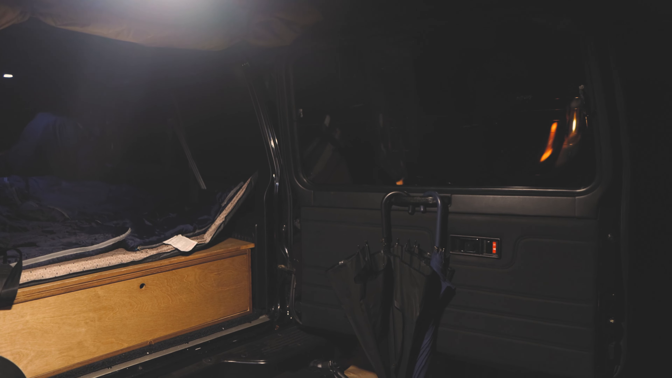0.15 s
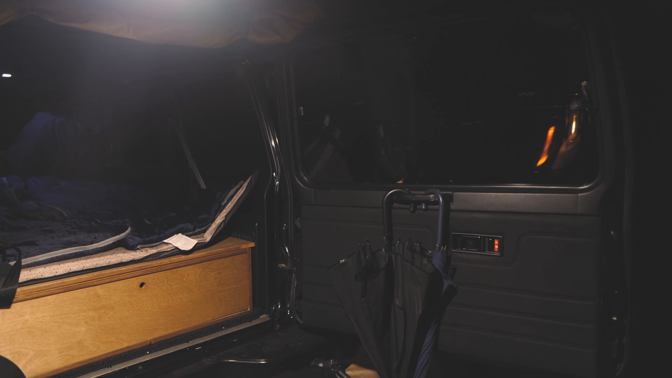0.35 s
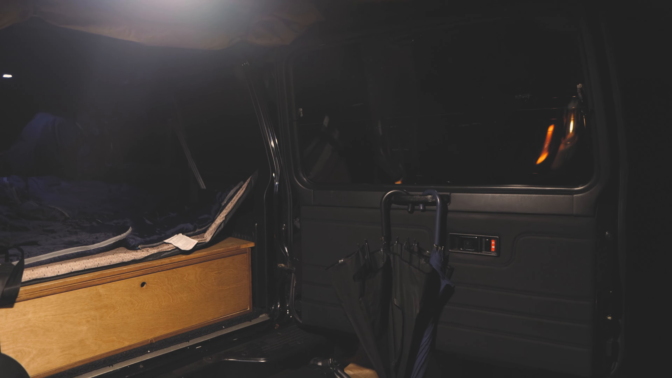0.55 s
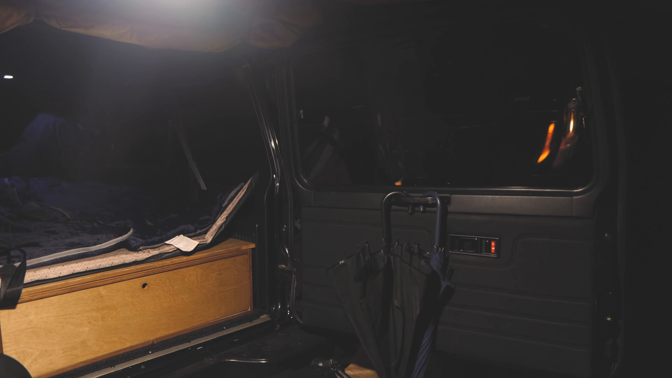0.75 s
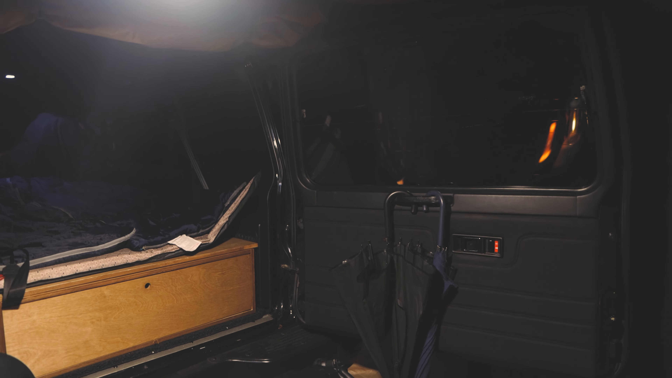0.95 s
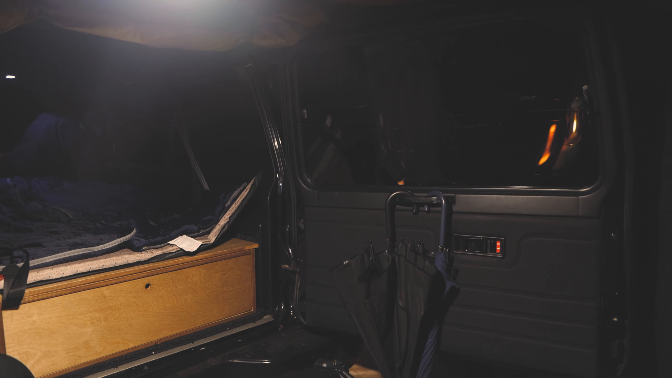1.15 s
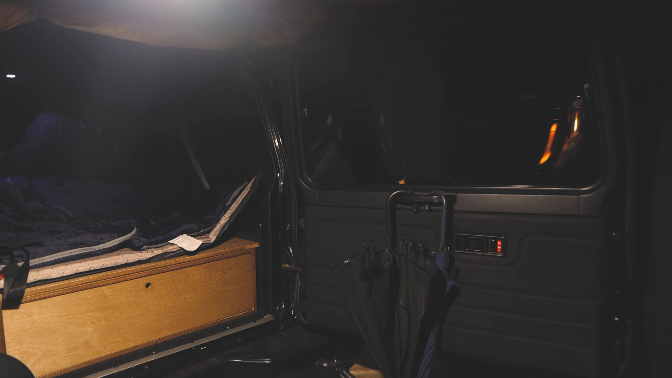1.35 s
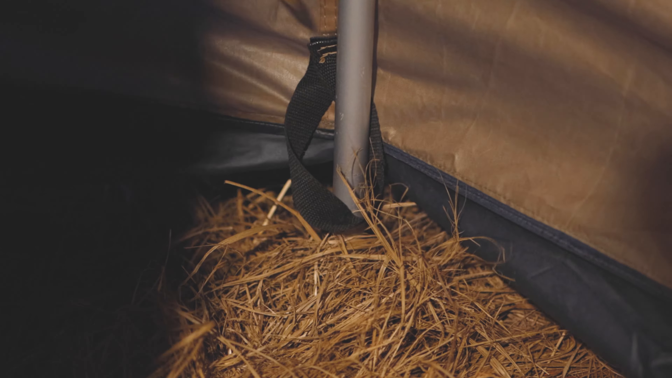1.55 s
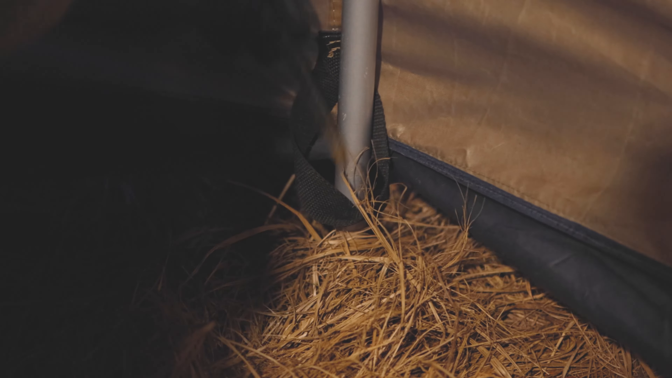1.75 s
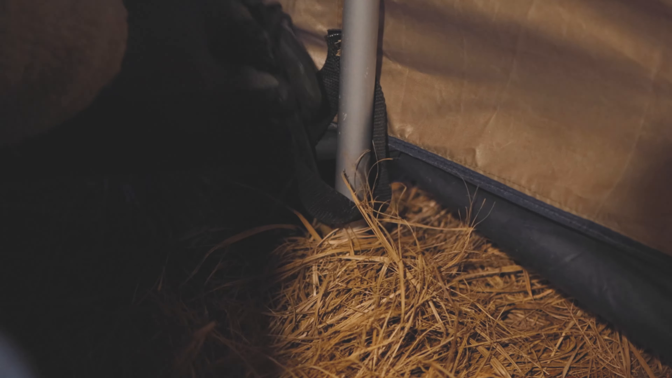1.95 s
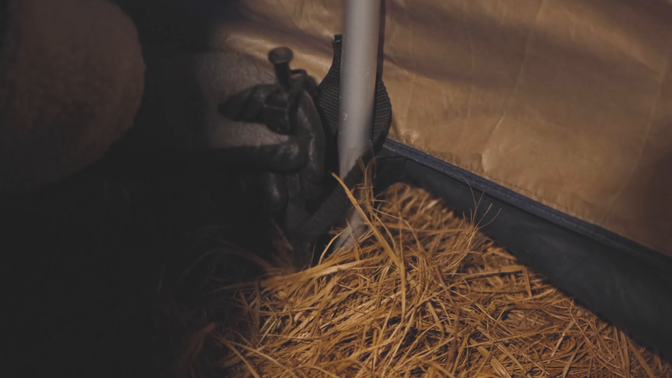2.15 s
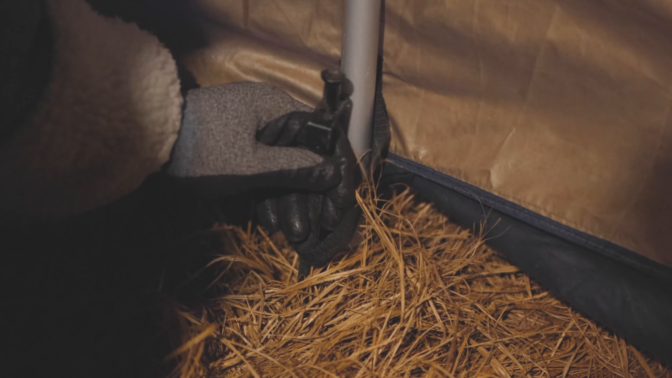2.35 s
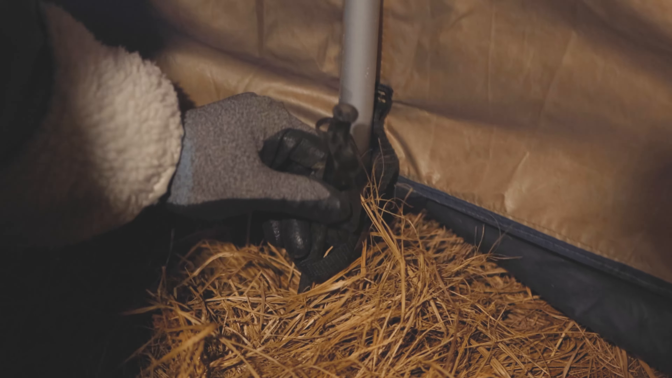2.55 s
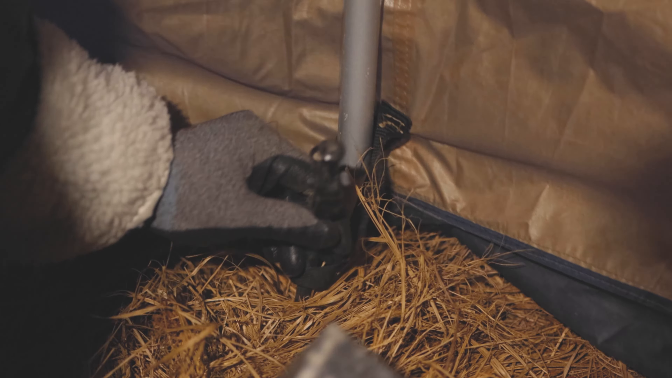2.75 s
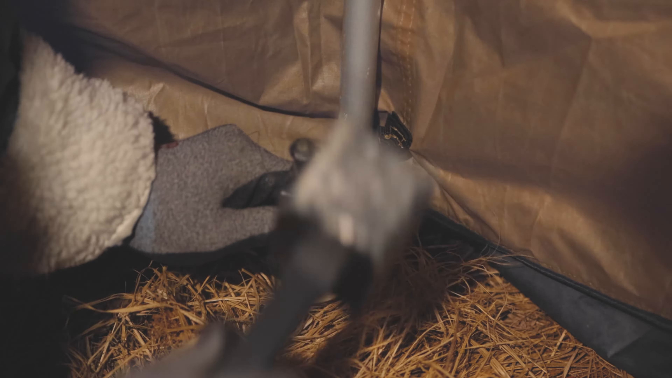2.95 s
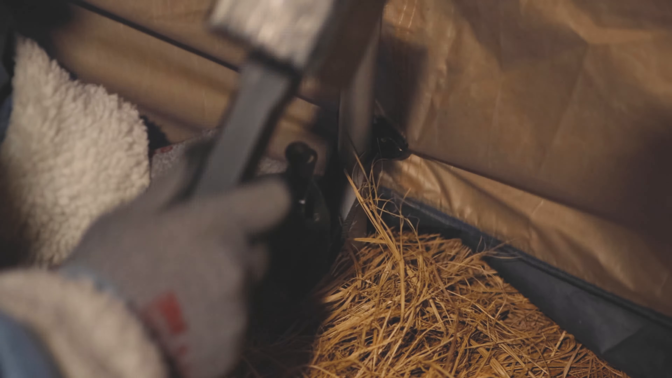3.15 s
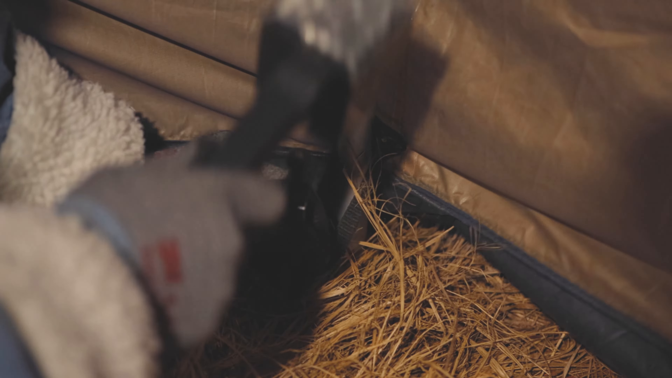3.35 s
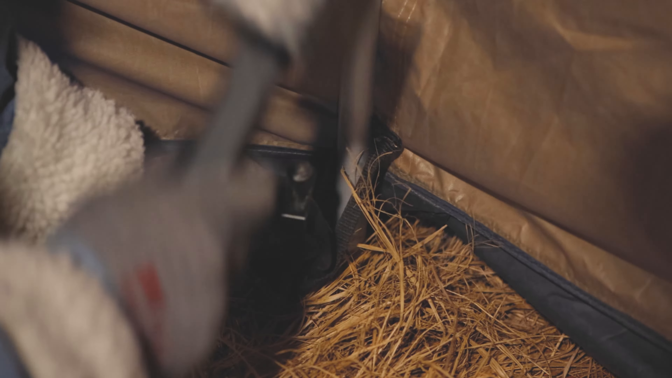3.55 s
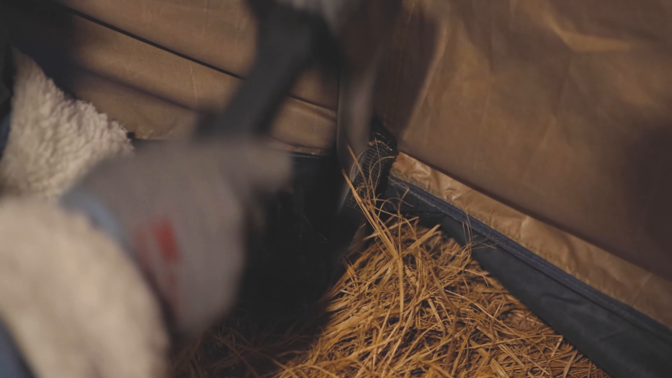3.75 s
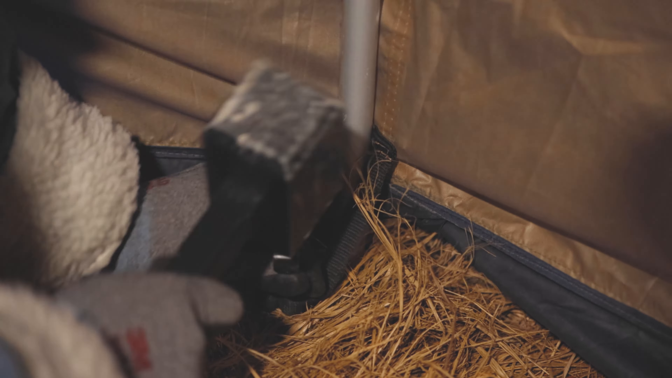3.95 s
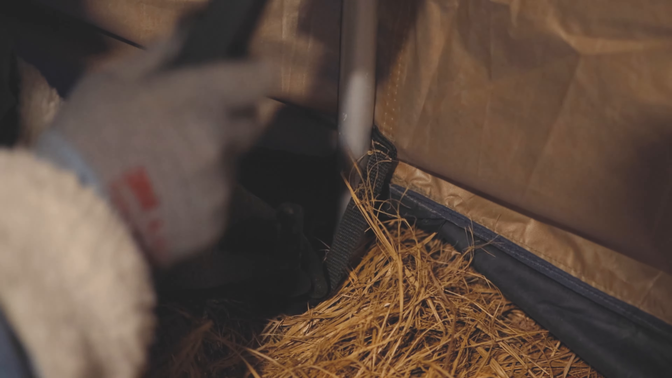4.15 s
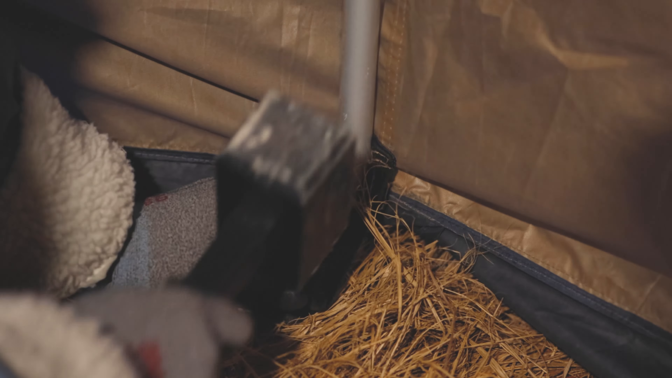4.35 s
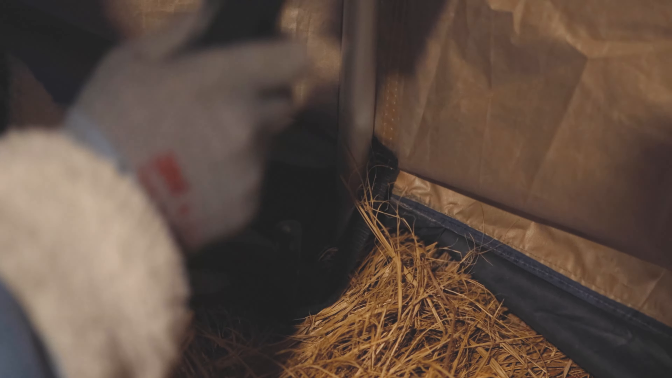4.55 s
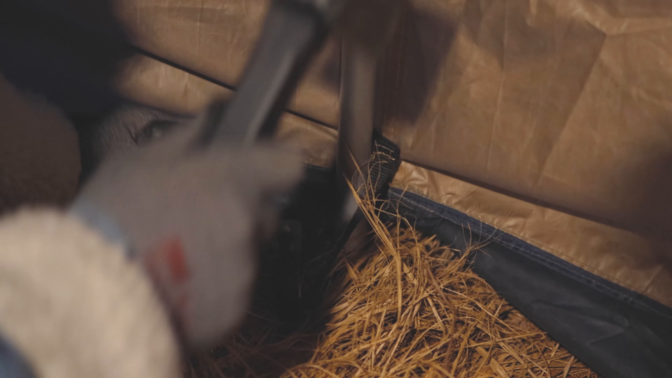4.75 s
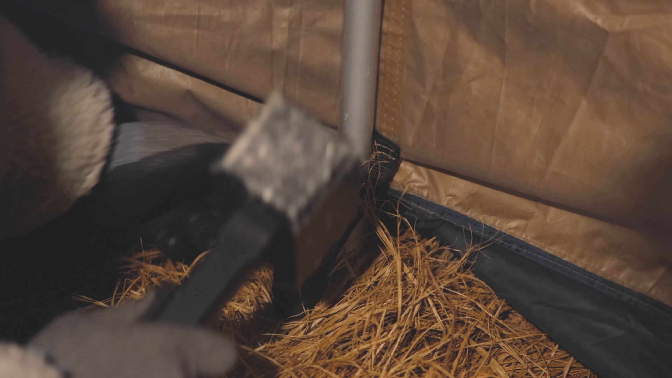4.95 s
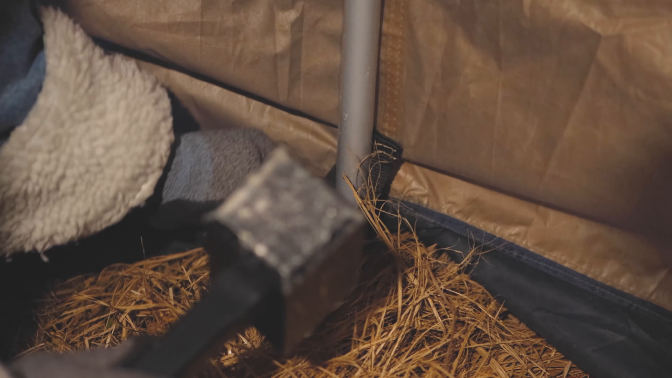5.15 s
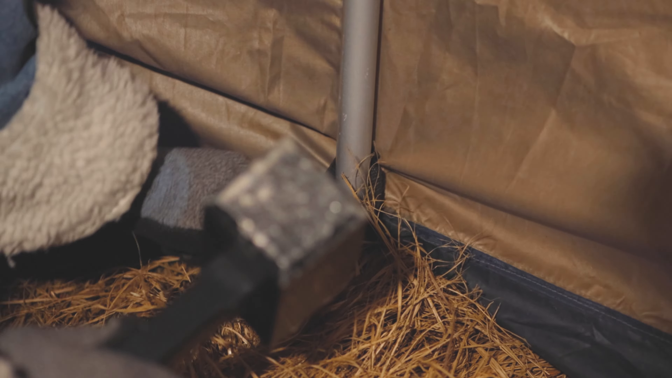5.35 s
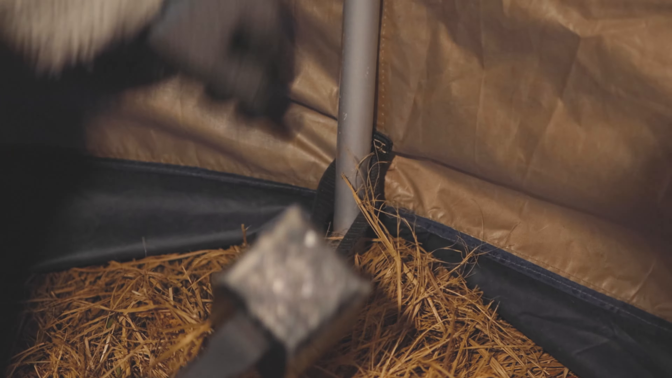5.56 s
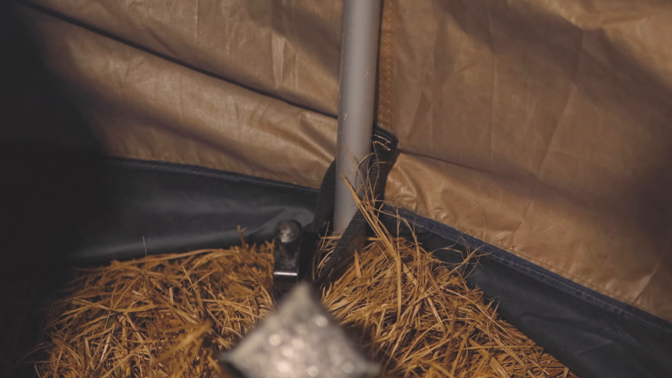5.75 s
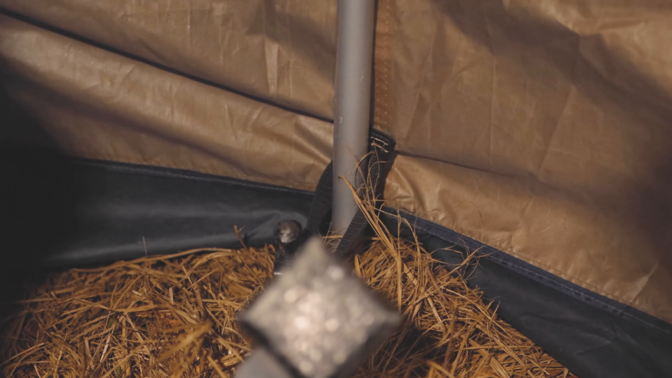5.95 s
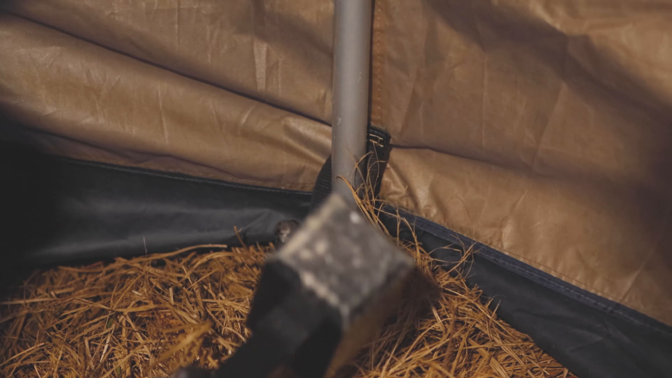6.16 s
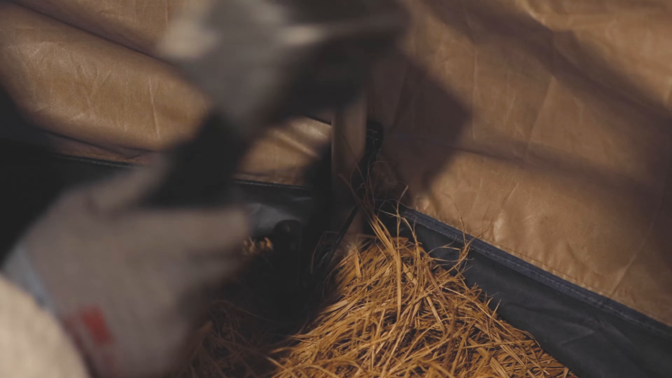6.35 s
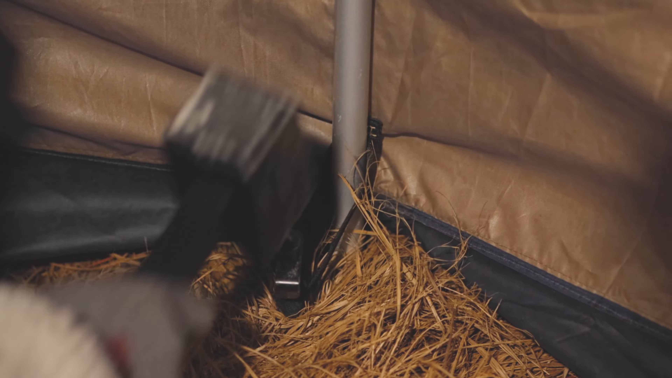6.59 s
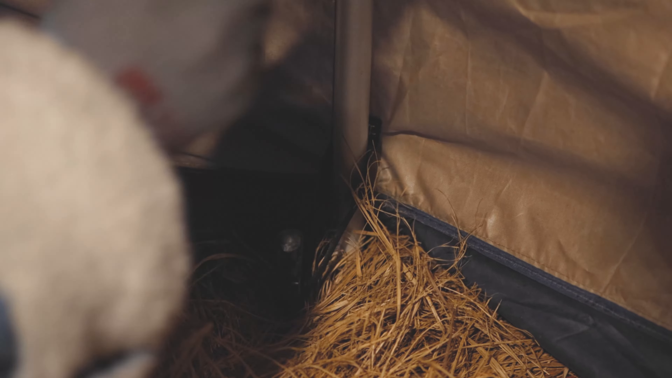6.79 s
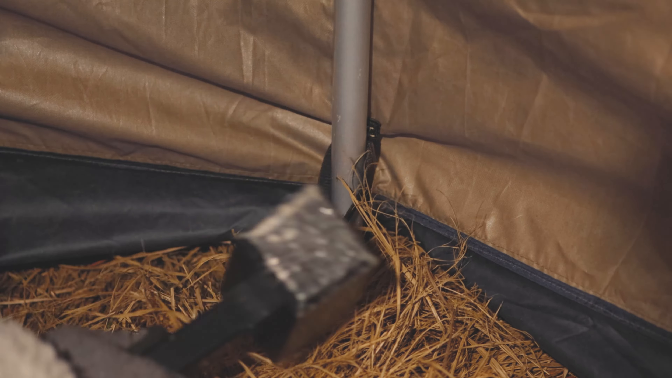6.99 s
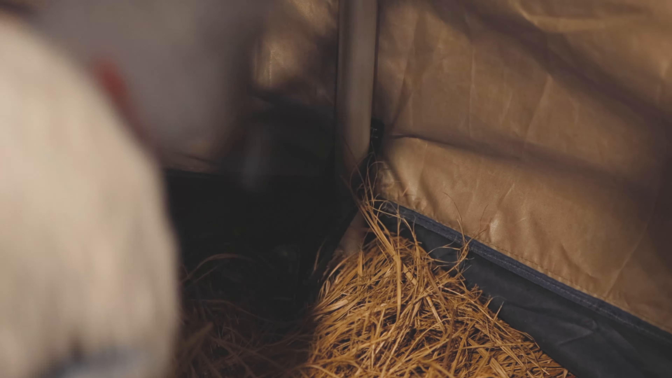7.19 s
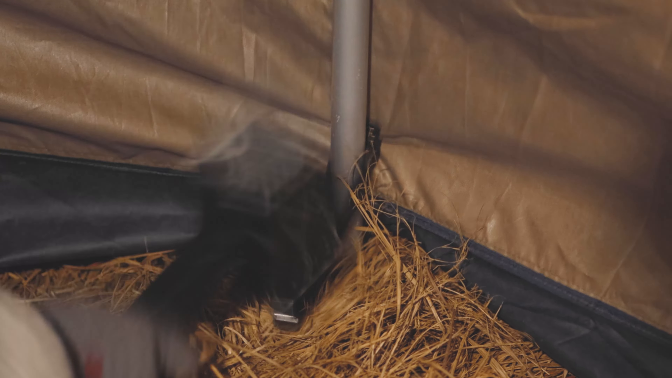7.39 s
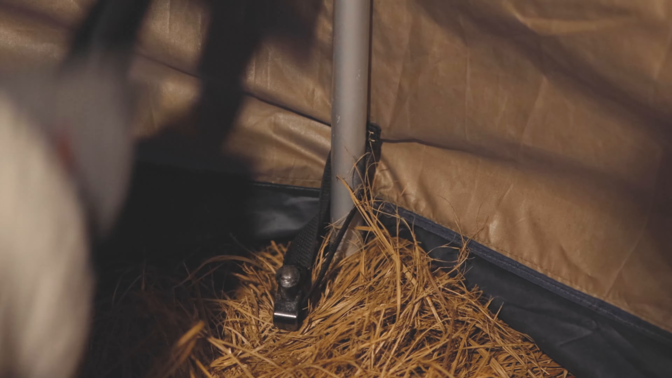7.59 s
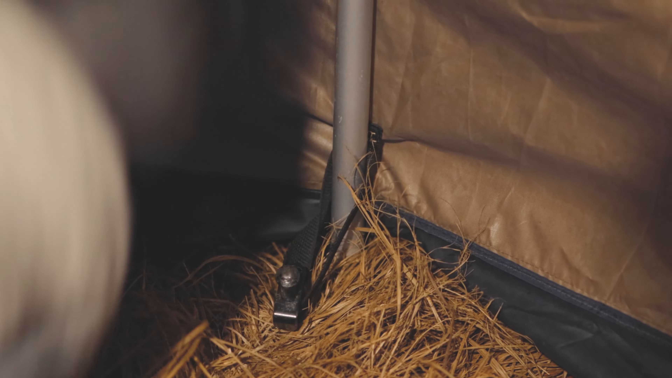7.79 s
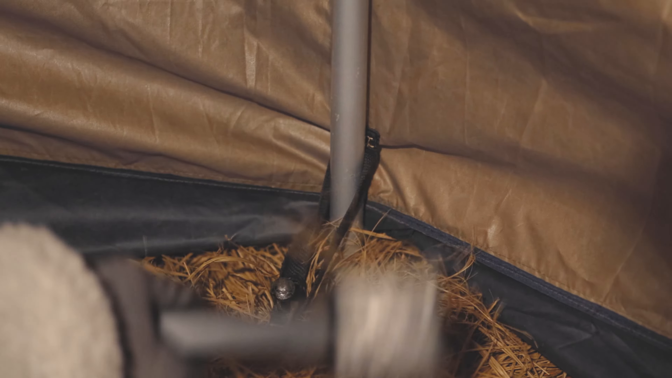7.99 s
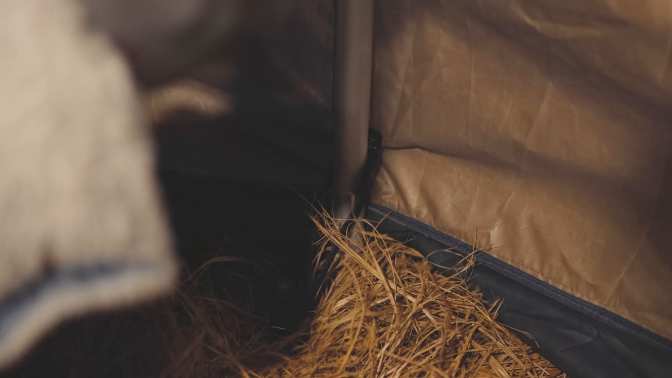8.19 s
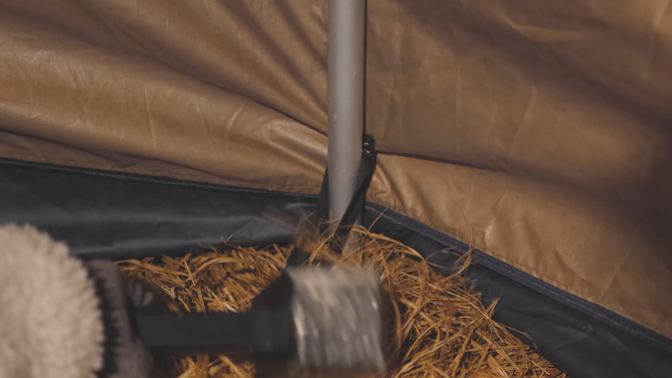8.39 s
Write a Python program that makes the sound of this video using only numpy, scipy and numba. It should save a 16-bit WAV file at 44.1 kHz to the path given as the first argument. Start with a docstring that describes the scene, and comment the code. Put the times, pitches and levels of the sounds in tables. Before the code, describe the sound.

After a quiet hush, clothing and straw rustle and a steel peg clinks, then eight sharp hammer blows drive it into the ground.

```python
"""Inside a quiet parked van, then at the corner of a tent at night, where a steel peg is set in straw.
Sleeves, canvas and straw rustle by friction over a low rumble, and a strap is dragged taut.
Held in a gloved hand, the peg clinks against its loose metal ring. Eight close hammer blows
excite its modes and thud into the soil; each overloads a gain control, which ducks briefly."""
import sys
import numpy as np
from scipy import signal
from scipy.fft import rfft, irfft
from scipy.io import wavfile
from scipy.ndimage import uniform_filter1d
from numba import njit

SR = 44100
rng = np.random.default_rng(int(sys.argv[2]) if len(sys.argv) > 2 else 0)


def transcribe(signal):
    """Save signal, clipped to [-1, 1], as a 16-bit WAV file at the path in sys.argv[1]."""
    frames = np.atleast_2d(signal).T
    limited = np.clip(frames, -1, 1)
    pcm = np.round(limited * 32767).astype(np.int16)
    wavfile.write(sys.argv[1], SR, pcm)


N = 371718
TIME = np.arange(N) / SR
AGE = np.arange(SR // 2) / SR  # time since a contact

# hammer blows: t/s, level/dB, peg f/Hz, then relative level/dB of bending, lengthwise ring, thud, rebound
BLOWS = [(3.3403, 9.5, 3010, -8, -6.5, -26, -39), (3.7090, 11, 2906, -5, -11, -25, -26.5),
         (4.0590, 11, 2950, -1.5, -9.5, -25, -22.5), (4.4070, 9, 2885, -0.5, -10, -41, -20.5),
         (6.6106, 0.5, 2850, -5.5, -10, -12, -18.5), (7.0544, 8.5, 2975, -6, -15.5, -11.5, -17.5),
         (7.513, 17, 2870, -4, -15, -10, -15), (7.9865, 14, 3050, -2.5, -10, -8.5, -10)]
# ring striking peg: t/s, level/dB, brightness/dB, lead of a first graze/s (0 for none)
CLINKS = [(2.317, -20, -9, 0), (2.5716, -24.5, -35, 0.0025), (2.644, -30, -33, 0.0042),
          (3.304, -8.5, -5.5, .008), (3.5771, -9, 3, 0.006), (3.655, -15.5, -1, 0), (3.9705, -14.5, 1, 0),
          (4.044, -27, -20, 0), (4.31, -16.5, 5, 0.0036), (4.6644, -17.5, -8, 0.014),
          (4.8677, -26, -21, 0.0013), (5.1515, -17.5, -5.5, 0.011), (5.6204, -20.5, -15, 0),
          (5.858, -29, -15, 0), (6.0568, -30, -38, 0), (6.3949, -27.5, -8, 0.0037),
          (6.511, -12.5, -32, .007), (6.5926, -7, -3, .0105), (6.6876, -23, -4, 0), (6.78, -27, -29, 0),
          (6.869, -15, 2, .0125), (7.043, -23, -25, 0.0013), (7.1492, -25, -13, 0.0084),
          (7.372, -18.5, 5, 0.0022), (7.4033, -21.5, -15, 0.0011), (7.5657, -9, -28, 0.005),
          (7.6272, -24.5, 0, 0), (7.6487, -20.5, -27, 0.011), (7.7435, -26, -15, 0.0072),
          (7.8945, -17.5, -18, 0.02), (7.9121, -20, -14, 0.0037), (7.9616, -22, -3, 0),
          (8.057, -24.5, 8, 0.0015), (8.106, -17, -33, 0.0079), (8.158, -27.5, -35, 0.0013),
          (8.3378, -24, -13, .013), (8.358, -19.5, -7, 0.0016)]
# spectra of a dry snap, a steel impact and steel scraping on steel: f/Hz, level/dB
SNAP_COLOUR = [(100, -5), (500, -7), (2000, 9.5), (4200, 2), (7500, -4), (10000, -17), (16000, -24)]
CRACK_COLOUR = [(100, 5.5), (400, -16), (900, 1.5), (1900, 4.5), (3700, 6), (5000, -1.5), (7500, -5),
                (10000, -25), (16000, -63)]
SCRAPE_COLOUR = [(3000, -11), (7000, 12.5), (10000, 1.5), (15000, 3)]


def undb(db):
    """Amplitude ratio for a level in decibels."""
    return 10 ** (np.asarray(db) / 20)


def curve(rows):
    """Linear interpolation in time of rows of t/s, value."""
    return np.interp(TIME, *np.transpose(rows))


def colour(x, points):
    """Spectral shaping by rows of f/Hz, level/dB, normalised to rms 1."""
    hz, db = np.transpose(points)
    f = np.maximum(np.fft.rfftfreq(len(x), 1 / SR), 1)
    y = irfft(rfft(x) * undb(np.interp(np.log(f), np.log(hz), db)), len(x))
    return y / y.std()


def walk(rate):
    """Slow random modulation: values held for 1 / rate s and smoothed twice."""
    hold = int(SR / rate)
    steps = np.repeat(rng.standard_normal(N // hold + 1), hold)
    y = uniform_filter1d(uniform_filter1d(steps, hold), hold)[:N]
    return y / y.std()


def grains(rate, spread_db):
    """A Poisson process: rate impulses a second, a few much larger than the rest."""
    impulses = (rng.random(N) < rate / SR) * rng.choice([-1, 1], N)
    return impulses * undb(spread_db * np.minimum(rng.exponential(size=N), 2 * np.pi))


def fade(t60):
    """Exponential decay, by 60 dB in t60 seconds."""
    return np.exp(-np.log(1000) * AGE / t60)


def mode(hz, t60):
    """Impulse response of a damped oscillator."""
    return np.sin(2 * np.pi * hz * AGE) * fade(t60)


def burst(points, t60):
    """A broadband transient: coloured noise in exponential decay."""
    return colour(rng.standard_normal(len(AGE)), points) * fade(t60)


def cluster(hz, width_hz):
    """Modal overlap: many close modes merge into a band of noise, rms 1."""
    f = np.fft.rfftfreq(len(AGE), 1 / SR)
    y = irfft(rfft(rng.standard_normal(len(AGE))) / (1 + ((f - hz) / width_hz * 2) ** 2), len(AGE))
    return y / y.std()


def add(track, s, sound):
    """Superpose a sound on the track at time s."""
    i = int(s * SR)
    track[i:i + len(sound)] += sound[:max(N - i, 0)]


def van():
    """A diffuse field: dull hush from all round, partly different at each ear, with small creaks."""
    # spectra of the hush common to both sides, of its opposed part and of a creak: f/Hz, level/dB
    mid_colour = [(15, -44), (25, -8.5), (133, -4), (264, -9.5), (1070, -11.5), (2500, -21), (2940, -24),
                  (4250, -32), (5540, -40), (6000, -41), (8690, -54), (14000, -59)]
    side_colour = [(24, -72), (40, -42), (86, -18), (198, -11), (270, -11), (425, -6), (1370, 0),
                   (5460, -12), (12000, -31), (15600, -60), (22000, -120)]
    creak_colour = [(200, -15), (1300, 10), (3500, 3), (7500, -15), (10000, -22), (16000, -45)]
    # envelope of the hush, and single creaks: t/s, level/dB
    hush_levels = [(0.0, -56.5), (0.388, -53.5), (1.164, -53), (1.19, -55), (1.5, -52.5)]
    creak_events = [(.372, -48), (0.734, -38), (1.338, -47)]
    mid = colour(rng.standard_normal(N), mid_colour)
    side = colour(rng.standard_normal(N), side_colour) * undb(-8)
    creaks = np.zeros(N)
    for s, db in creak_events:
        add(creaks, s, undb(db) * (.5 * burst(creak_colour, .015) + .27 * burst(creak_colour, .21)))
    return np.array([mid + side, mid - side]) * undb(curve(hush_levels) + .5 * walk(10.9)) + creaks


def rumble():
    """Low-frequency noise around the camp, slowly modulated in amplitude."""
    # spectrum: f/Hz, level/dB
    spectrum = [(20, -35), (45, -9), (80, -0.5), (120, 2.5), (180, -2.5), (260, -19), (500, -40.5),
                (1500, -44)]
    # envelope: t/s, level/dB
    levels = [(1.56, -44), (1.73, -41.5), (2.09, -46.5), (3.11, -40), (3.49, -47), (3.74, -48), (5.06, -48),
              (5.69, -40.5), (7.68, -46.5), (8.43, -45)]
    return colour(rng.standard_normal(N), spectrum) * undb(curve(levels) + 1.5)


def strap_drag():
    """Sliding friction: dense tiny slips as the strap is dragged taut through straw."""
    # friction spectrum: f/Hz, level/dB
    spectrum = [(30, -33), (200, 7.5), (900, -6), (1800, 6), (4000, -1), (6500, -12), (10000, -20),
                (16000, -21)]
    # envelope: t/s, level/dB
    levels = [(1.55, -27.5), (1.62, -37.5), (1.70, -38.5), (1.76, -35), (1.9, -70)]
    slips = colour(grains(rate=9800, spread_db=.5), spectrum)
    return slips * undb(curve(levels)) * (TIME < levels[-1][0])


def handling(still_cloth_db=-53.5, still_straw_db=-70.5):
    """Incoherent sources add in power: arm movements set the amplitudes of cloth and straw rustle."""
    # arm movements: fastest t/s, cloth level/dB, rise/s, fall/s, straw re cloth/dB
    moves = [(1.61, -39.5, 0.059, 0.15, -4), (1.79, -40.5, 0.036, 0.17, 0), (2.03, -58.5, 0.069, 0.34, 5),
             (2.719, -46, 0.5, 0.57, -9), (3.289, -35.5, 0.44, 0.037, -11.5),
             (3.465, -36.5, 0.17, 0.17, -1.5), (3.98, -44, 0.075, 0.16, -3), (4.36, -43, 0.083, 0.043, -27),
             (4.9, -50.5, 0.063, 0.59, -34), (5.42, -38.5, 0.14, 0.22, -8), (6.4, -47.5, 0.97, 0.79, -17)]
    cloth_power, straw_power = undb(still_cloth_db) ** 2, undb(still_straw_db) ** 2
    for s, db, rise_s, fall_s, straw_db in moves:
        swell = np.exp(-np.abs(TIME - s) / np.where(TIME < s, rise_s, fall_s))
        power = (undb(db) * swell) ** 2
        cloth_power += power
        straw_power += power * undb(straw_db) ** 2
    return np.sqrt(cloth_power), np.sqrt(straw_power)


def rustle(cloth_gain, straw_gain):
    """Shot noise: cloth rubs in dense uneven grains, straw crackles above it and single stalks break."""
    # spectra of cloth and straw: f/Hz, level/dB
    cloth_colour = [(25, -50), (70, 2.5), (200, 0.5), (400, 0.5), (700, -0.5), (1300, -0.5), (2200, -6.5),
                    (4000, -11), (6000, -16.5), (10000, -32.5)]
    straw_colour = [(300, -56), (1500, 2.5), (4000, 3.5), (5500, 1), (8000, -5.5), (10500, -11),
                    (16000, -15)]
    cloth = colour(grains(rate=5000, spread_db=2.5), cloth_colour) * undb(5.5 + 2 * walk(45))
    straw = colour(grains(rate=3500, spread_db=2), straw_colour) * undb(3.5 + 3.05 * walk(35))
    stalks = signal.oaconvolve(grains(rate=35, spread_db=2.5), burst(SNAP_COLOUR, .012))[:N]
    return cloth_gain * cloth + straw_gain * (straw + undb(-8.5) * stalks / stalks.std())


def crinkles(cloth_gain, count=600):
    """Buckling: folds of stiff cloth flick over, each ringing a few cycles at its own frequency."""
    out = np.zeros(N)
    for when, pitch, size in rng.random((count, 3)):
        hz = 900 * 5 ** pitch
        cycles = hz * AGE[:SR // 40]
        flick = np.sin(2 * np.pi * cycles) * np.exp(-cycles / 2)
        add(out, when * N / SR, undb(17.6 * size ** 3) * flick)
    return out * cloth_gain * undb(7.5)


def snaps():
    """Heavily damped transients: the strap buckle clicks and stalks break."""
    # snaps: t/s, level/dB, body f/Hz, relative level/dB of body and of low knock
    events = [(1.743, -8, 3780, 5, -3), (1.93, -8, 3590, 4.5, -16), (3.0005, -15, 4100, -3, -4),
              (3.446, -7, 2280, -25, -37), (3.798, -22.5, 2280, -3, -19), (4.743, -29.5, 3020, 7.5, -31),
              (6.098, -26, 2000, -3, -23)]
    out = np.zeros(N)
    for s, db, body_hz, body_db, knock_db in events:
        click = 1.15 * burst(SNAP_COLOUR, .0051) + undb(-15) * burst(SNAP_COLOUR, .093)
        body = undb(body_db) * mode(body_hz, .0079)
        knock = undb(knock_db) * mode(240, .019)
        add(out, s, undb(db) * (click + body + knock))
    return out


def squeaks():
    """Narrow-band friction noise swells and fades as webbing and glove slide on the peg."""
    # slides: centre t/s, duration/s, f/Hz, bandwidth/Hz, level/dB
    slides = [(1.79, 0.036, 6360, 900, -38.5), (2.089, 0.022, 5970, 700, -42.5),
              (2.383, 0.046, 12000, 2450, -51), (2.848, .03, 12100, 300, -55),
              (3.49, 0.059, 12030, 400, -44.5), (6.82, 0.052, 10820, 2490, -54)]
    out = np.zeros(N)
    for s, length_s, hz, width_hz, db in slides:
        swell = np.exp(-((AGE - AGE.mean()) / (length_s / 2)) ** 2 / 2)
        add(out, s - AGE.mean(), undb(db) * cluster(hz, width_hz) * swell)
    return out


def peg(pitch_hz, bright_db, thin_db, scatter_db, grip_t60, free_db):
    """Modal superposition: glove and soil damp one part of the peg's vibration, a free part rings on."""
    # modes of the peg with its ring: f/Hz, level/dB, t60/s
    modes = [(2950, 0, .05), (2865, -6, .1), (3050, -4, .06), (3225, -10, .05), (3600, -14, .04),
             (3880, -13, .045), (4160, -16, .04), (5280, -19, .03), (6780, -9, .06), (6980, -14, .04),
             (7500, -16, .04), (8900, -20, .02), (10680, -21, .17), (11780, -21, .04), (13200, -24, .025),
             (14170, -19, .07), (14930, -21, .05)]
    hz, db, t60 = np.transpose(modes)
    detune, scatter = rng.uniform(-1.09, 1, (len(modes), 2)).T
    bending = hz < 4500
    thin = t60 == t60.max()  # the longest-lived overtone
    # the grip detunes the low modes from touch to touch; the overtones hardly move
    hz = hz * np.where(bending, pitch_hz / hz[0] * (1 + .02 * detune), 1 + .002 * detune)
    db = db + scatter_db * scatter + bright_db * ~bending + thin_db * thin
    tone = undb(db) @ np.array([mode(f, decay) for f, decay in zip(hz, t60)])
    tone[len(AGE) // 2:] = 0
    return tone * (fade(grip_t60) + undb(free_db))


def jingle(in_hand_s=2.3, held_db=-52.5, shaken_db=-45.5, stirred_db=-28):
    """Random excitation: the loose ring trembles on the held peg, roused by each blow and clink."""
    # the glove stills the ring: start t/s, end t/s (acts only where start < end)
    steadied = [(3.83, 3.95), (4.93, 4.8), (7.768, 7.87), (8.219, 7.9)]
    tremble = np.zeros(N)
    for pitch_hz in np.linspace(2840, 3100, 4):
        tone = peg(pitch_hz, bright_db=-5.5, thin_db=-17, scatter_db=-1.5, grip_t60=.14, free_db=5)
        tick = undb(5) * burst(CRACK_COLOUR, .026)
        tremble += signal.oaconvolve(grains(rate=22, spread_db=3), tone + tick)[:N]
    unrest = undb(held_db) * (TIME > in_hand_s)
    for s, *_ in BLOWS:
        add(unrest, s, undb(shaken_db) * np.exp(-TIME[:SR] / .2))
    for s, db, *_ in CLINKS:
        add(unrest, s, undb(db + stirred_db) * np.exp(-AGE / .075))
    free = 1. - sum((TIME > start) & (TIME < end) for start, end in steadied)
    return tremble / tremble.std() * unrest * uniform_filter1d(free, size=SR // 30)


def chatter(sound, span_s, count):
    """Contact bounce: a loose part touches again in quick, weaker repeats."""
    out = sound.copy()
    for late, size in rng.random((count, 2)):
        lag = 1 + int(late * span_s * SR)
        out[lag:] += (.5 + .5 * size) * sound[:-lag]
    return out


def touch(db, bright_db):
    """The point of contact sets the mix of modes, so each touch of ring on peg has its own timbre."""
    pitch_hz = 2950 * (1 + .015 * rng.standard_normal())
    free_db = np.interp(db, [-22, -12], [1, -14])  # a hard touch presses the parts and chokes them
    tone = peg(pitch_hz, .72 * bright_db + 6, thin_db=-9, scatter_db=8, grip_t60=.084, free_db=free_db)
    crack = undb(-13.5 + .2 * db) * burst(CRACK_COLOUR, .057)
    scrape = undb(.65 * bright_db - 16.5) * burst(SCRAPE_COLOUR, .048)
    clink = chatter(tone / np.abs(tone).max() + crack + scrape, span_s=.0037, count=2)
    return undb(db + 2) * clink / np.abs(clink).max()


def clinks(graze_db=-5.5, fall_back_db=-15.5, fall_back_s=.012):
    """Inelastic collisions: the ring may graze the peg, then strikes it and falls back more softly."""
    out = np.zeros(N)
    for s, db, bright_db, lead_s in CLINKS:
        if lead_s > 0:
            add(out, s - lead_s, touch(db + graze_db, bright_db))
        add(out, s, touch(db, bright_db))
        add(out, s + fall_back_s * (.5 + rng.random()), touch(db + fall_back_db, bright_db))
    return out


def hammer(rebound_s=.011):
    """Steel impact excites the peg's bending and lengthwise modes, thuds into soil and rebounds once."""
    # hollow modes of hammer handle and hard ground: f/Hz, level/dB, t60/s
    knock_modes = [(335, -12, 0.027), (898, 1.5, 0.015), (1456, -3.5, 0.011), (1940, 8.5, 0.0083),
                   (2325, 2.5, 0.012), (3910, 13.5, 0.006)]
    out = np.zeros(N)
    for s, db, pitch_hz, bending_db, along_db, thud_db, rebound_db in BLOWS:
        # the soil stiffens the peg as it sinks, which raises the lengthwise ring
        along_hz = np.interp(s, [3.34, 3.71, 4.06], [12900, 12980, 13300])
        along = undb(along_db) * cluster(along_hz, 650) * (fade(.022) + undb(-34) * fade(.19))
        # a thin overtone sings out as the peg comes home
        thin = undb(np.interp(s, [7.05, 7.51, 7.99], [-60, -36, -46])) * mode(10680, .14)
        shaft = peg(pitch_hz, bright_db=-8, thin_db=-32, scatter_db=2, grip_t60=.025, free_db=-26)
        ping = undb(bending_db) * (mode(pitch_hz, .036) + undb(-8) * shaft)
        crack = undb(-1.5) * burst(CRACK_COLOUR, .016)
        thud = undb(thud_db + 6) * mode(78, .015)
        knock = undb(.6 * thud_db - 2) * sum(undb(mode_db) * mode(hz * rng.uniform(.97, 1.03), t60)
                                             for hz, mode_db, t60 in knock_modes)
        ring_tone = undb(-19) * cluster(pitch_hz, 340) * fade(.14)
        jangle = undb(.52 * rebound_db) * (ring_tone + undb(-23.5) * burst(CRACK_COLOUR, .18))
        grit = undb(.6 * rebound_db - 25) * burst(SCRAPE_COLOUR, .15)  # the shaft scrapes past the ring
        rebound = .6 * mode(pitch_hz, .031) + 1.27 * burst(CRACK_COLOUR, .013) + .43 * knock
        add(out, s, undb(db) * (ping + thin + crack + along + thud + knock + jangle + grit))
        add(out, s + rebound_s, undb(db + rebound_db) * rebound)
    return out


def bumps():
    """Damped knocks of glove, canvas and soil, whose frequency falls as tension relaxes."""
    # knocks: t/s, level/dB, first f/Hz, last f/Hz, t60/s
    events = [(3.910, -27, 250, 130, .035), (3.911, -32, 1200, 280, .16), (6.629, -27, 450, 400, .06),
              (7.099, -28, 600, 400, .03), (7.566, -11, 920, 230, .009)]
    out = np.zeros(N)
    for s, db, first_hz, last_hz, t60 in events:
        hz = last_hz + (first_hz - last_hz) * np.sqrt(fade(t60))
        add(out, s, undb(db) * np.sin(2 * np.pi * np.cumsum(hz) / SR) * fade(t60))
    return out


def sleeve_swish():
    """Friction noise brightens with sliding speed as a sleeve sweeps over the canvas."""
    # spectra of slow and fast sliding: f/Hz, level/dB
    slow_colour = [(100, -7), (300, 0), (700, -9.5), (2000, -20), (8000, -27.5)]
    fast_colour = [(100, -16), (600, -10), (1400, 1), (3000, -5), (6000, -13), (10000, -16.5), (16000, -21)]
    # envelope: t/s, level/dB
    levels = [(5.87, -89), (5.90, -29.5), (5.93, -27.5), (5.975, -28.5), (5.99, -44)]
    speed = np.interp(TIME, [5.90, 5.96], [0, 1])
    weave = grains(rate=9800, spread_db=3)
    sweep = (1 - speed) * colour(weave, slow_colour) + speed * colour(weave, fast_colour)
    return sweep * undb(curve(levels)) * (TIME > levels[0][0]) * (TIME < levels[-1][0])


def scene(outside_s=1.552):
    """The van, then the tent, where scattering by canvas and ground gives impacts a short faint tail."""
    impacts = hammer() + clinks() + snaps() + bumps()
    scatter = burst(CRACK_COLOUR, .097) * (1 - fade(.011))
    tail = undb(-25) * signal.fftconvolve(impacts, scatter / np.linalg.norm(scatter))[:N]
    cloth_gain, straw_gain = handling()
    tent = impacts + tail + jingle() + rustle(cloth_gain, straw_gain) + crinkles(cloth_gain)
    tent += strap_drag() + sleeve_swish() + squeaks() + rumble()
    return np.where(TIME < outside_s, van(), tent)


@njit
def follow(x, attack, release):
    """Envelope detection: first-order smoothing that rises and falls at different rates."""
    out, envelope = np.empty(len(x)), 0.
    for i in range(len(x)):
        envelope += (x[i] - envelope) * (attack if x[i] > envelope else release)
        out[i] = envelope
    return out


def record(dry, threshold=.27, attack_s=.0041, release_s=.04, ceiling=.49, low_hz=32, top_hz=15900):
    """Compression lags each blow, so the first cycles saturate; filters then limit the bandwidth."""
    envelope = follow(np.abs(dry[0]), 1 / (attack_s * SR), 1 / (release_s * SR))
    ducked = dry / np.maximum(envelope / threshold, 1)
    clipped = ducked / (1 + (ducked / ceiling) ** 6) ** (1 / 6)
    thinned = signal.sosfilt(signal.butter(2, low_hz, "high", fs=SR, output="sos"), clipped)
    return signal.sosfiltfilt(signal.ellip(8, .05, 50, top_hz, fs=SR, output="sos"), thinned)


dry = scene()
out = record(dry)
transcribe(out)
```